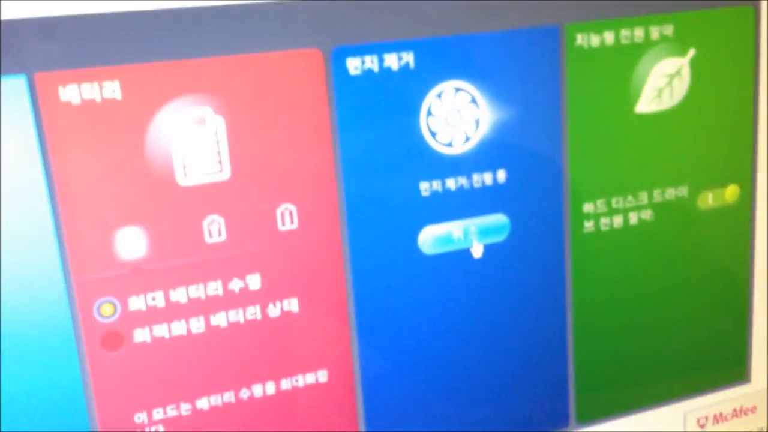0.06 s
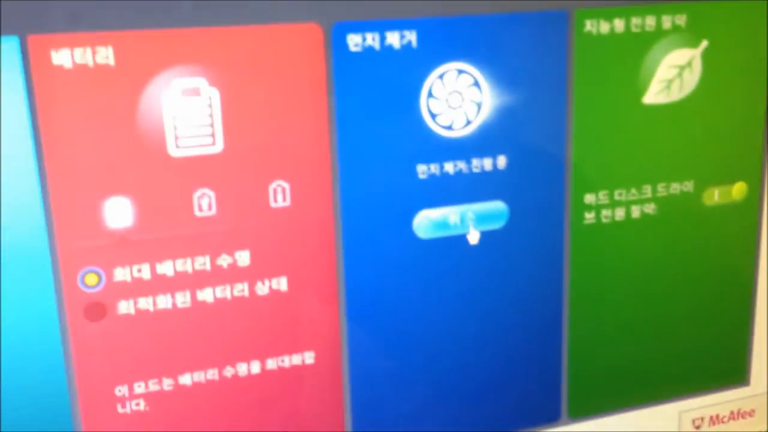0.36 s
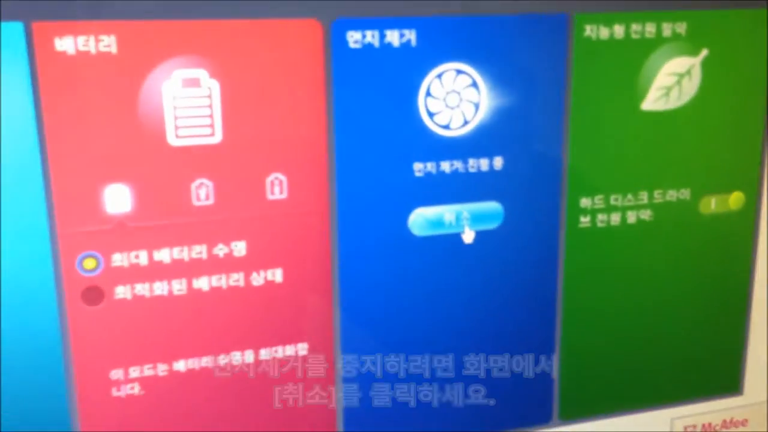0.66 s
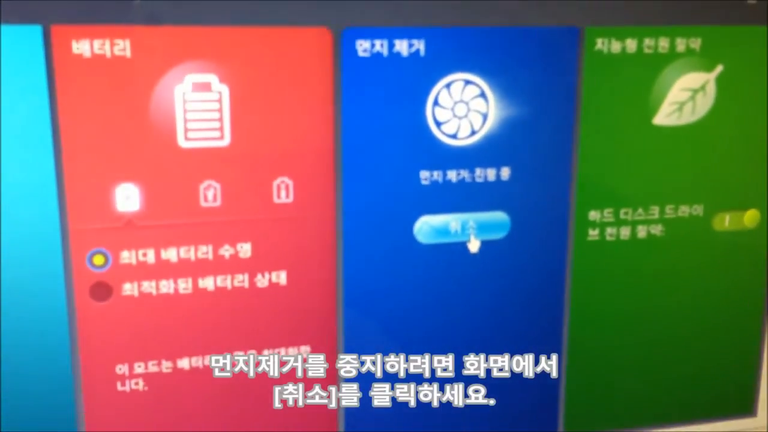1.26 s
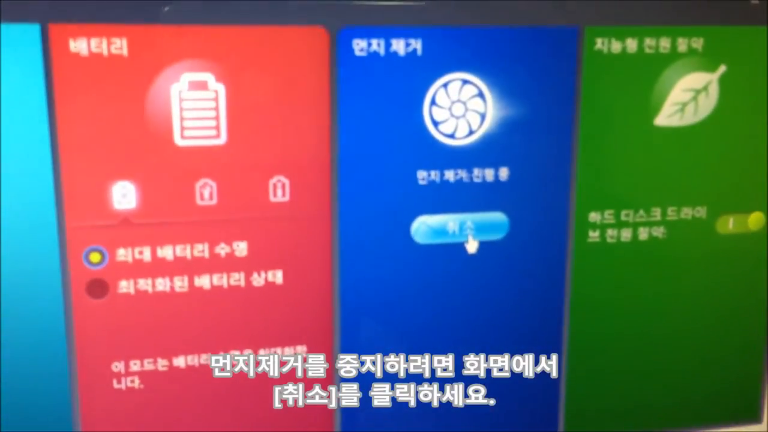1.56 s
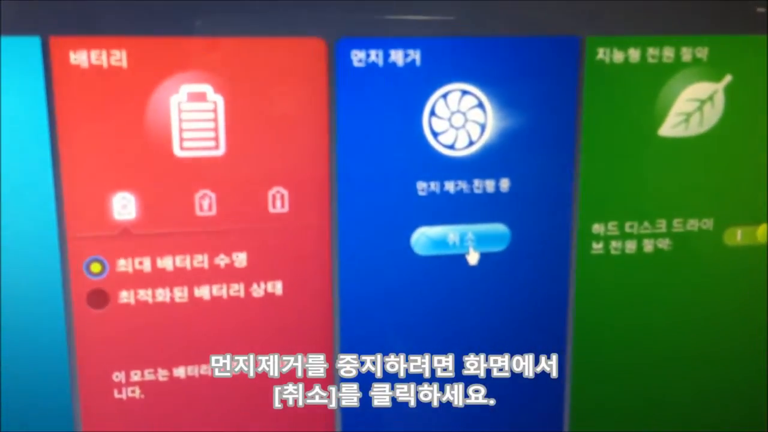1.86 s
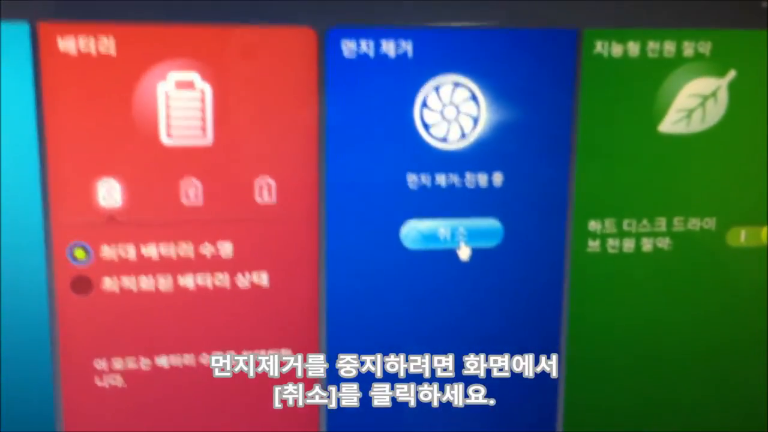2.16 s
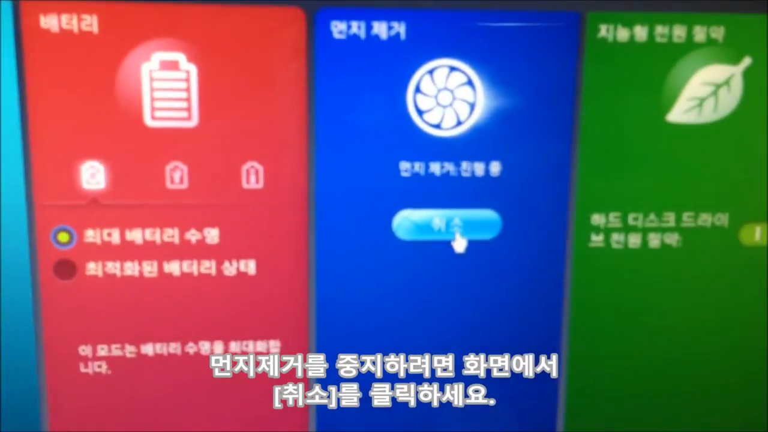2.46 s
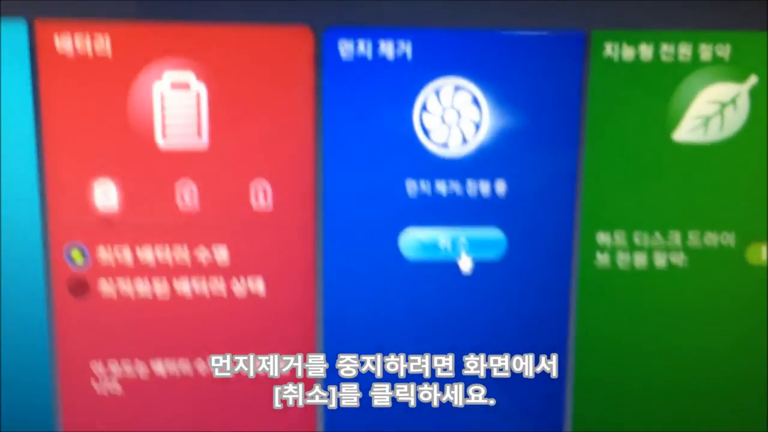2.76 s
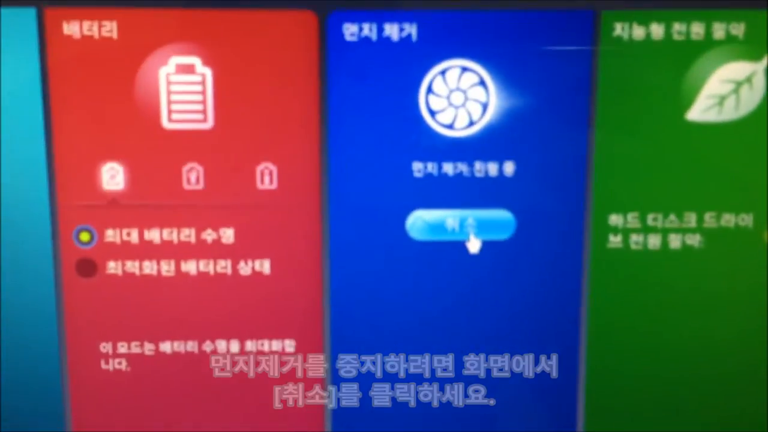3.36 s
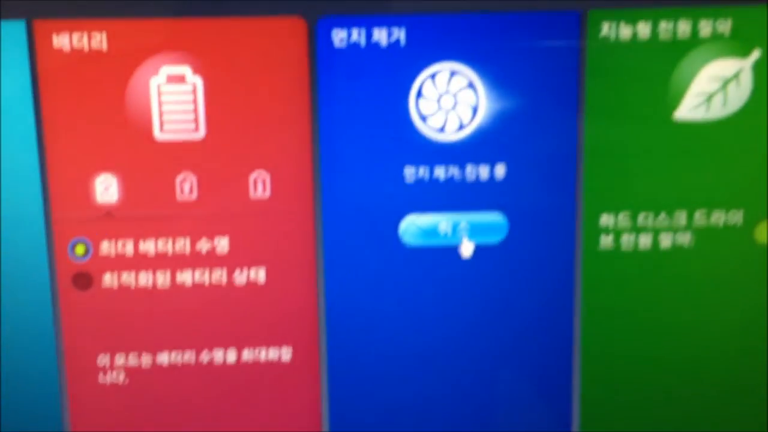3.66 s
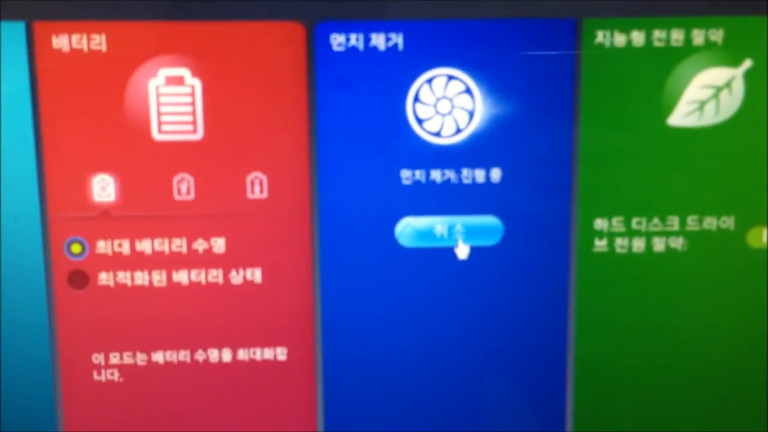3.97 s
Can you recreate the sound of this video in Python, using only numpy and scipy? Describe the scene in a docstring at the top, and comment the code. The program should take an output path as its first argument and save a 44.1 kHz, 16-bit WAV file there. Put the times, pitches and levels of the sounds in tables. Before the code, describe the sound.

A steady rush of air comes from a laptop's fans, heard up close indoors, with a thin high whine and a faint hum. The whine wavers later on, and the fans fade out right at the end.

```python
"""Laptop fans, close up.

A laptop's cooling fans run flat out, close to a hand-held microphone in a quiet room. Air rushes
through the vents under a steady blade whine and a low rotor hum; the colour shifts as the microphone
drifts. Near the end the fans fade at constant pitch, leaving the room. Now and then the treble dips."""
import sys
import numpy as np
from scipy import signal
from scipy.fft import rfft, irfft
from scipy.io import wavfile
from scipy.ndimage import uniform_filter1d

SR = 44100
rng = np.random.default_rng(int(sys.argv[2]) if len(sys.argv) > 2 else 0)


def log_audio(samples):
    """Write samples as a 16-bit WAV file to the path given in sys.argv[1]."""
    # one column per channel
    frames = np.atleast_2d(samples).T
    # limit to full scale, then quantise
    limited = np.clip(frames, -1, 1)
    pcm = np.round(limited * 32767).astype(np.int16)
    wavfile.write(sys.argv[1], SR, pcm)


N = 176400
T, HZ = np.arange(N) / SR, np.fft.rfftfreq(N, 1 / SR)

# Room tone and microphone hiss: frequency_hz, relative_db
ROOM_SPECTRUM = [(25, -37), (55, -20.5), (100, -12.5), (170, 4.5), (260, 2), (500, 3), (1000, -7),
                 (2500, -11), (5000, -9.5), (9000, -10.5), (15000, -10.5)]
# Faint, steady rotor tones: turn_multiple -> level_db
HUM_TONES = {1: -94, 12: -77.5}
# The strongest tone of the hum, at the microphone: time_s, level_db
DRONE_LEVELS = [(0, -60.5), (.5, -65), (2.2, -66), (3.5, -64.3), (3.72, -65), (3.8, -72)]
# Blade whine at the microphone: time_s, level_db
WHINE_LEVELS = [(0, -74), (.17, -56), (.4, -57), (1.4, -56), (1.8, -55.5), (2.4, -55), (2.6, -65),
                (2.8, -57.5), (3.1, -69), (3.35, -67), (3.5, -59), (3.62, -69), (3.8, -72)]
# Bands of turbulence, the first around the whine: centre_hz, width_hz, [(time_s, level_db)]
TURBULENCE_BANDS = [(2717, 214, [(0, -54), (1.2, -56.5), (2.3, -56.5), (2.9, -57), (3.15, -59), (3.5, -58),
                    (3.75, -54)]), (1467, 280, [(0, -61), (.9, -64), (1.6, -61), (2.3, -64), (2.8, -73),
                    (3.25, -67), (3.7, -62)]), (3430, 220, [(0, -67), (2.2, -67), (2.7, -68), (3.25, -67),
                    (3.6, -62.5)]), (4890, 320, [(0, -71.5), (1.8, -70), (2.4, -70), (3.0, -78),
                    (3.6, -69)]), (2200, 170, [(0, -79), (1.9, -76), (2.6, -68), (3.2, -59.5), (3.6, -72)]),
                    (5190, 340, [(0, -82), (1.7, -70), (2.4, -64), (2.95, -63), (3.3, -66), (3.6, -65)]),
                    (6304, 89, [(0, -76), (1.5, -70.5), (2.2, -72), (3.0, -76)])]
# Air through the vents, heard close: frequency_hz, relative_db
VENT_SPECTRUM = [(60, -35), (130, -21), (200, -17.5), (255, -2.5), (288, -11.5), (335, 0.5), (395, -7),
                 (470, -4.5), (555, 3), (620, -1), (710, -3), (830, -5), (1100, -1.5), (1450, -1.5),
                 (1900, 0), (2400, 0), (3000, -2.5), (3250, -4), (3600, -5.5), (4200, -4.5), (4700, -8.5),
                 (5300, -11.5), (5750, -9), (6080, -12), (6800, -14.5), (8000, -19.5), (10000, -24.5),
                 (15000, -37)]
# Brief dips of the treble: centre_s, length_s, depth_db
TREBLE_DIPS = [(.082, 0.02, 5), (0.208, 0.018, 15), (.252, .011, 14), (.422, 0.01, 17), (0.807, 0.01, 14),
               (.891, 0.015, 13), (.968, .028, 26), (1.084, 0.013, 13), (1.243, 0.027, 26),
               (1.406, 0.02, 12), (1.532, 0.013, 14), (1.874, 0.013, 15), (1.938, 0.018, 12),
               (2.279, 0.013, 14), (2.405, 0.01, 16), (2.833, 0.022, 12), (2.92, 0.015, 12),
               (3.537, 0.012, 13), (3.73, 0.013, 14)]


def amp(db):
    """Decibels to gain."""
    return 10 ** (np.asarray(db) / 20)


def unit(x):
    """Scales to an rms of one."""
    return x / np.sqrt(np.mean(x ** 2) + 1e-20)


def over_time(points):
    """Gain along a table of time_s, level_db."""
    return amp(np.interp(T, *np.transpose(points)))


def over_hz(points):
    """Gain along a table of frequency_hz, relative_db, on a log-frequency axis."""
    hz, db = np.transpose(points)
    return amp(np.interp(np.log(HZ + 1), np.log(hz), db))


def noise(spectrum):
    """Noise of unit rms with the given spectrum."""
    return unit(irfft(rfft(rng.standard_normal(N)) * spectrum, N))


def drift(rate_hz):
    """Slow random motion of unit rms, up to about the given rate."""
    return noise((HZ > 0) / (1 + (HZ / rate_hz) ** 4))


def split(x, edge_hz, order):
    """The parts of a sound below and above an edge."""
    low = irfft(rfft(x) / (1 + (HZ / edge_hz) ** order), N)
    return low, x - low


def room_tone(level_db=-63.5):
    """The quiet room behind the laptop, with the microphone's own hiss."""
    return amp(level_db) * noise(over_hz(ROOM_SPECTRUM))


def rotor(turn_hz=74.5, blades=37, drone_multiple=5, wander=0.000447, waver_db=0.2, flutter_db=0.8):
    """One shaft drives the low hum and the whine of the passing blades."""
    speed_hz = turn_hz * (1 + wander * drift(rate_hz=1.25))
    angle = 2 * np.pi * np.cumsum(speed_hz) / SR
    drone_gain = over_time(DRONE_LEVELS) * amp(waver_db * drift(rate_hz=4.6))
    whine_gain = over_time(WHINE_LEVELS) * amp(flutter_db * drift(rate_hz=5.5))
    tones = [(multiple, amp(db)) for multiple, db in HUM_TONES.items()]
    tones += [(drone_multiple, drone_gain), (blades, whine_gain)]
    return np.sqrt(2) * sum(gain * np.sin(multiple * angle + 2 * np.pi * rng.random())
                            for multiple, gain in tones)


def turbulence():
    """Narrow bands of rushing that come and go as the microphone drifts in the hand."""
    bands = np.zeros(N)
    for centre_hz, width_hz, levels in TURBULENCE_BANDS:
        peak = 1 / (1 + ((HZ - centre_hz) / (0.88 * width_hz)) ** 2)
        bands += over_time(levels) * noise(peak)
    return bands


def reflection(delay_s=0.00702, share=0.29, centre_hz=2210, width_hz=380):
    """Response at the microphone: the direct sound plus the midrange thrown back by a nearby surface."""
    reflected = share * np.exp(-((HZ - centre_hz) / width_hz) ** 2)
    return 1 + reflected * np.exp(-2j * np.pi * HZ * delay_s)


def uneven_flow(air, depth_db=1.2):
    """Uneven air flow lifts and lowers small patches of the sound in frequency and time."""
    spectra = signal.stft(air, nperseg=1024)[2]
    patches = uniform_filter1d(rng.standard_normal(spectra.shape), size=9, axis=0)
    patches = unit(uniform_filter1d(patches, size=10, axis=1))
    return signal.istft(spectra * amp(depth_db * patches), nperseg=1024)[1][:N]


def vent_rush(level_db=-50, swell_db=0.4, ripple_db=0.93, ripple_above_hz=600):
    """Turbulent air from the vents at close range, rippled by a reflection and faint narrow resonances."""
    ripple = unit(uniform_filter1d(rng.standard_normal(len(HZ)), size=160))
    resonances = amp(ripple_db * ripple * HZ / (HZ + ripple_above_hz))
    air = uneven_flow(noise(over_hz(VENT_SPECTRUM) * reflection() * resonances))
    return amp(level_db + swell_db * drift(rate_hz=14.0)) * unit(air)


def scene(fade_start_s=3.713, bass_db_per_s=59, treble_db_per_s=88.5):
    """The fans in front of the room, fading at the end, treble fastest; both channels alike."""
    bass, treble = split(vent_rush() + turbulence() + rotor(), edge_hz=1500, order=4)
    fading_s = np.maximum(T - fade_start_s, 0)
    fans = bass * amp(-bass_db_per_s * fading_s) + treble * amp(-treble_db_per_s * fading_s)
    return np.tile(fans + room_tone(), (2, 1))


def record(dry, body_share=0.015, top_hz=15350):
    """The treble dips for an instant here and there, the body barely; the very top is cut off."""
    dip_db = sum(depth_db * 0.5 ** ((2 * (T - centre_s) / length_s) ** 4)  # flat-bottomed dips
                 for centre_s, length_s, depth_db in TREBLE_DIPS)
    body, treble = split(dry, edge_hz=6630, order=16)
    dipped = body * amp(-body_share * dip_db) + treble * amp(-dip_db)
    lowpass = signal.firwin(1023, top_hz, window=("kaiser", 9), fs=SR)
    return signal.oaconvolve(dipped, lowpass[None], "same", axes=1)


dry = scene()
out = record(dry)
log_audio(out)
```